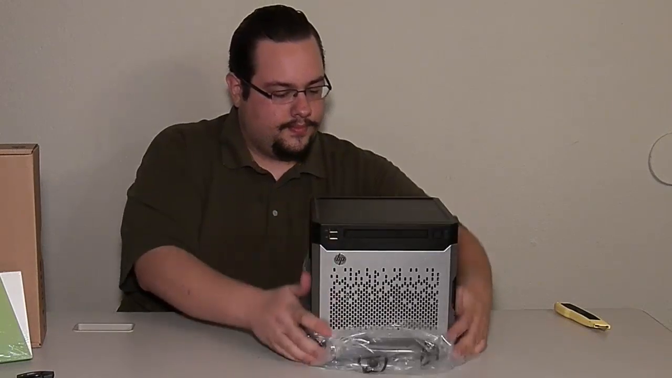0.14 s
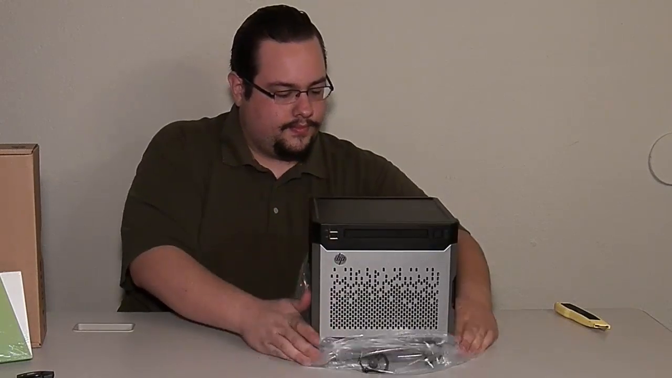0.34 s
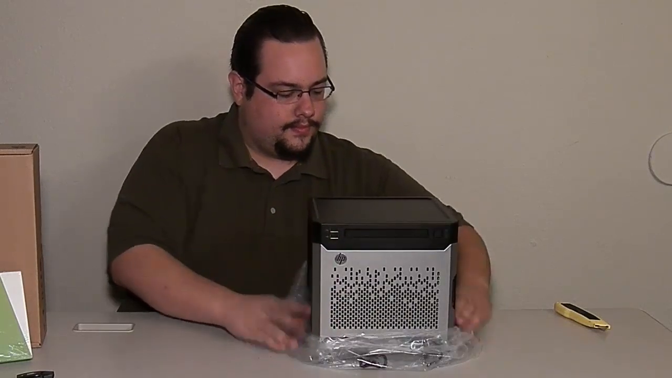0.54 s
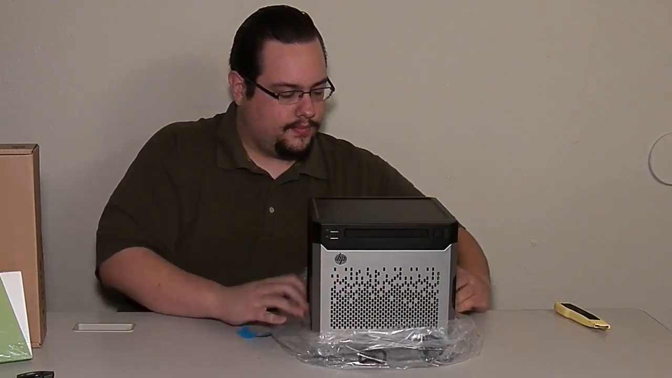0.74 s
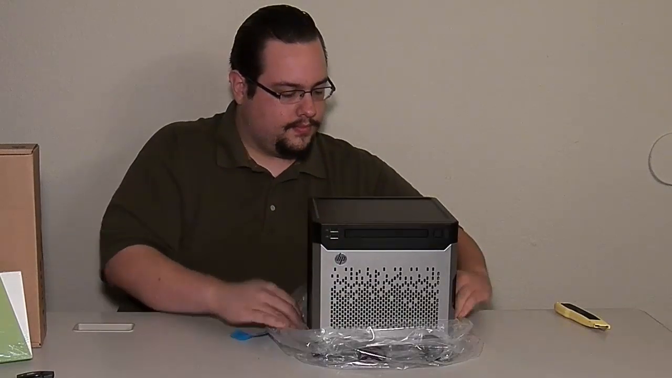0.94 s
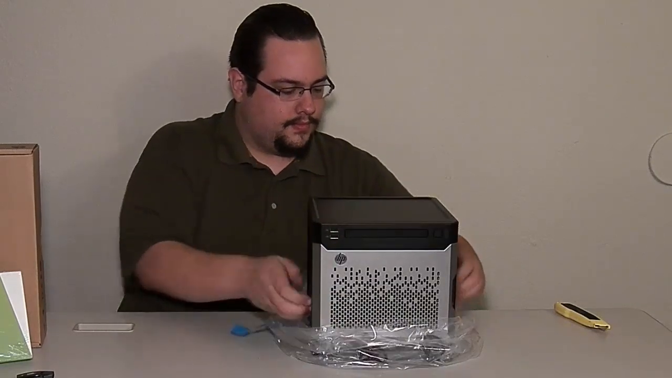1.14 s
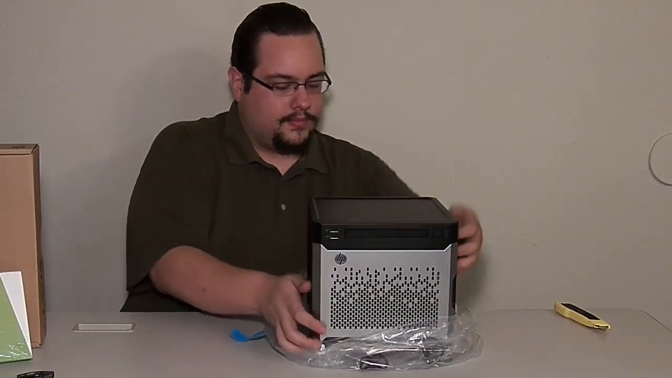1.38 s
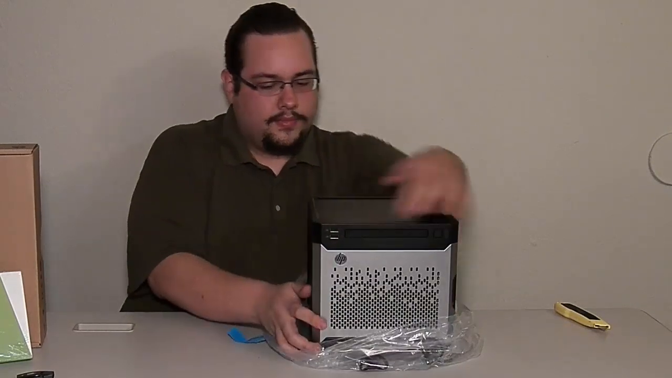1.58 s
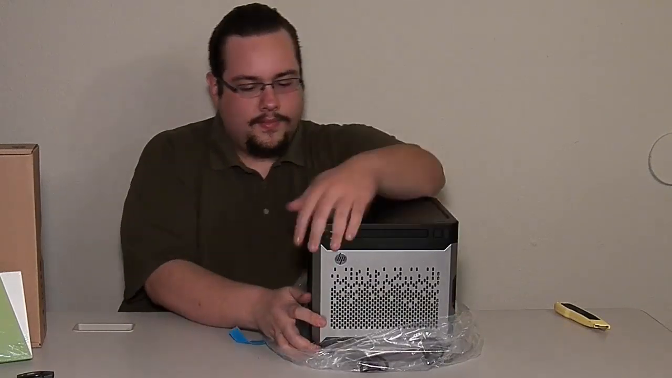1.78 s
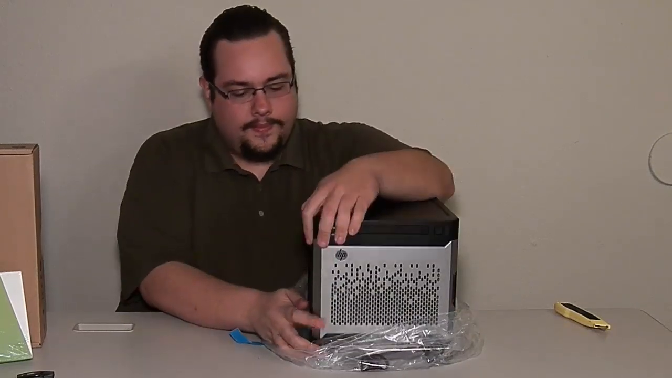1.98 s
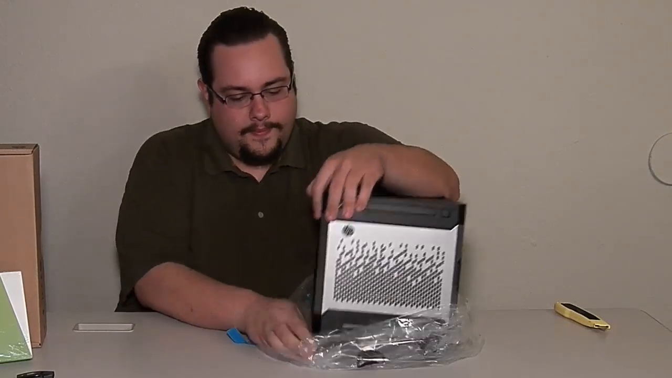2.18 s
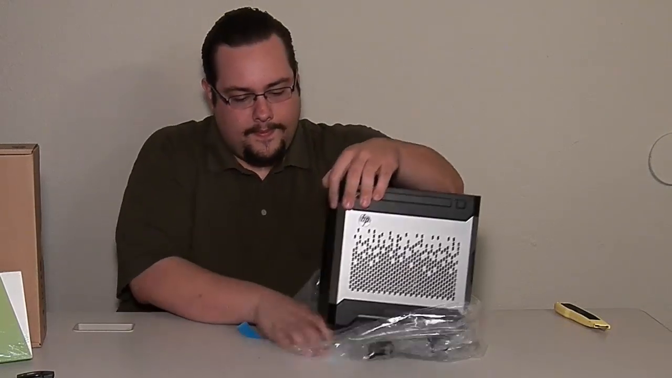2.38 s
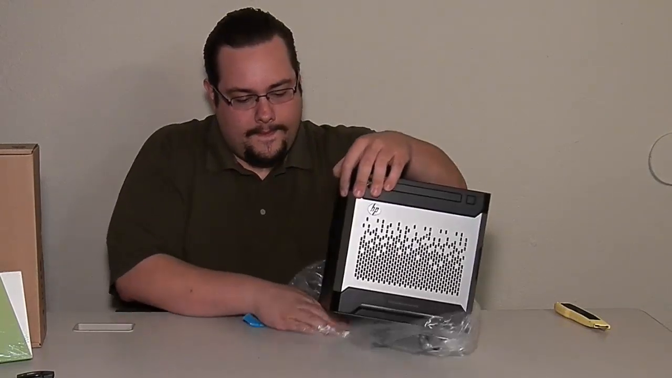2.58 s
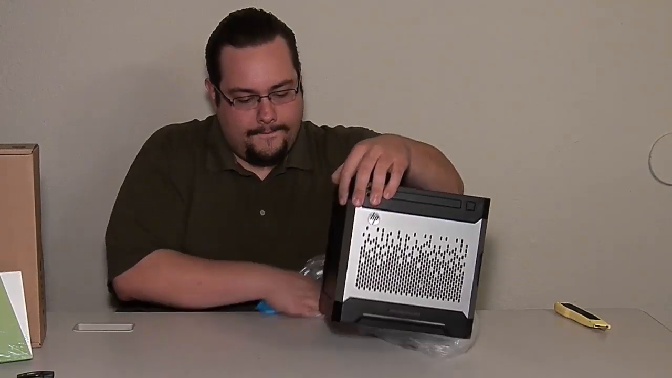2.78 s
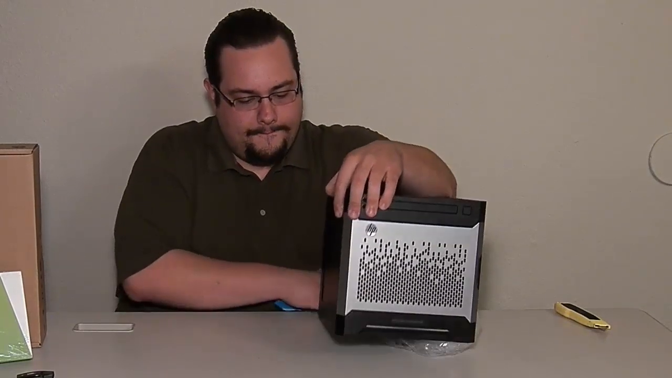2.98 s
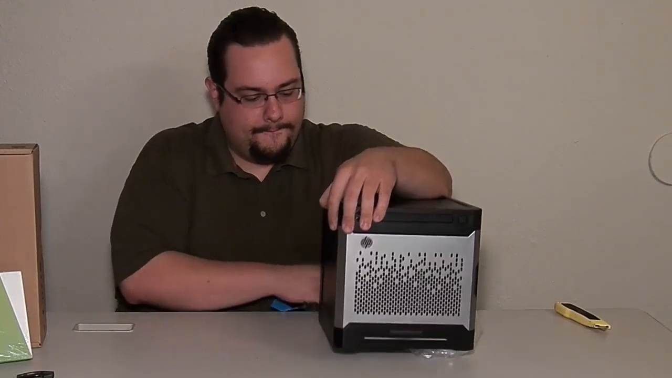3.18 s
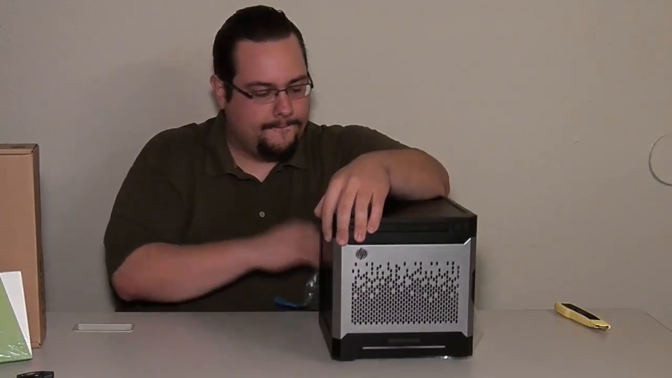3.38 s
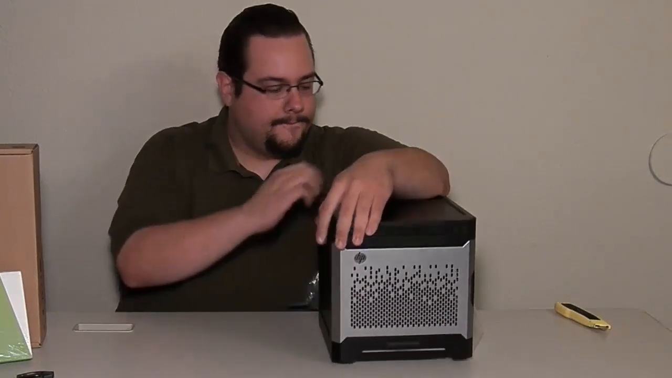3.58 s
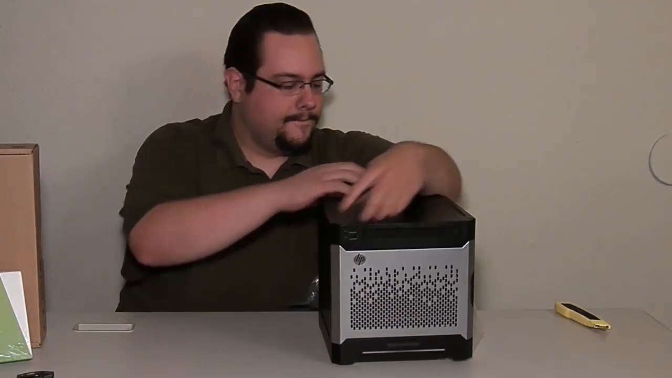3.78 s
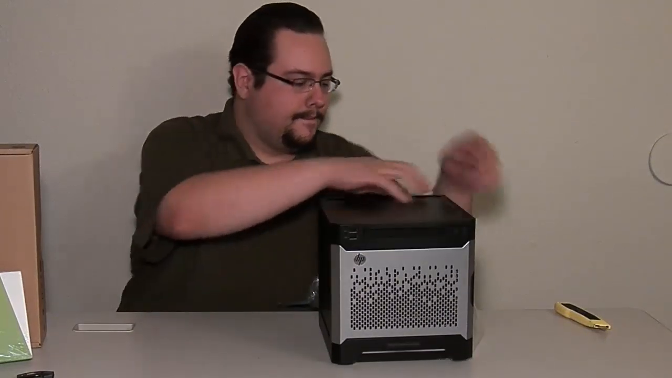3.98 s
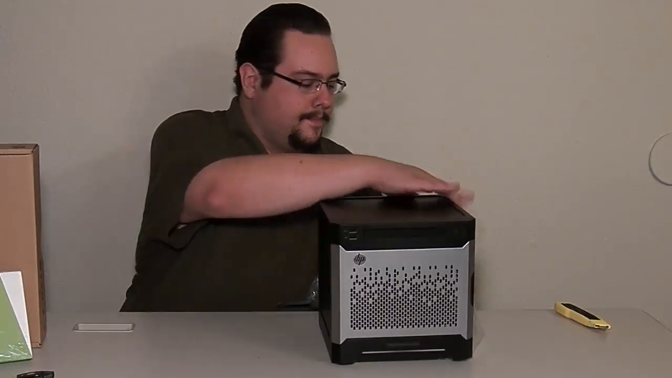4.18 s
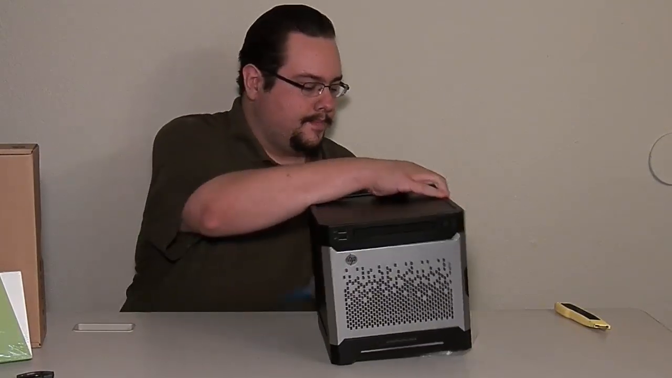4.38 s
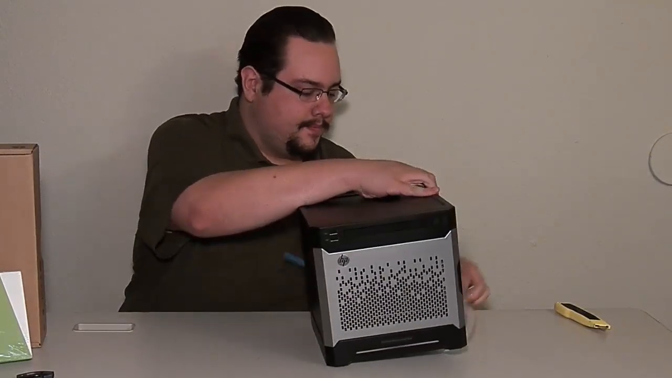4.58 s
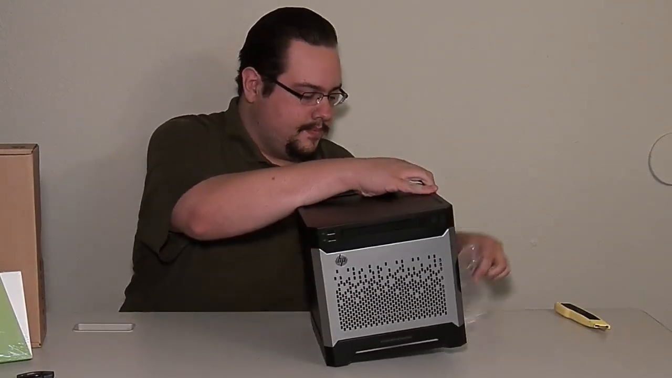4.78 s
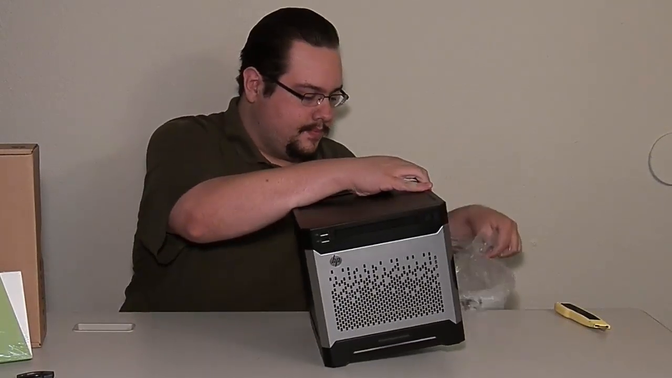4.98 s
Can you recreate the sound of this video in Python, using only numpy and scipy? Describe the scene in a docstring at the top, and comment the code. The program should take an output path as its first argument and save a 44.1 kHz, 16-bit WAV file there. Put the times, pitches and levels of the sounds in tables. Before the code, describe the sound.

Crisp film crinkling and snapping in a small room, fading to near silence before a last taut rustle and dull low bumps.

```python
"""Film crackles in tiny snaps: a thin plastic bag is worked out from under a small metal box on a desk.
Random clicks and rubbing noise, split by fold size, make the crinkle; slack sheets swish lower down.
Single creases flip through as louder clicks, and late on the taut film slides with a narrow hiss.
Resonances let the box's panels ring along, and damped desk modes make soft thuds as it sets down.
A small room answers with decaying noise echoes; a faint hum, hiss and thin whine lie underneath."""
import sys
import numpy as np
from scipy import signal
from scipy.fft import rfft, irfft, next_fast_len
from scipy.io import wavfile
from scipy.ndimage import map_coordinates

SR = 44100
rng = np.random.default_rng(int(sys.argv[2]) if len(sys.argv) > 2 else 0)


def put_to_file(sound):
    """Save the sound as 16-bit audio at rate SR, in the file named by the first command-line argument."""
    columns = np.atleast_2d(sound).T  # one column per channel
    safe = np.clip(columns, -1, 1)
    whole_steps = np.round(safe * 32767)
    wavfile.write(sys.argv[1], SR, whole_steps.astype(np.int16))


N = 222043
TIME = np.arange(N) / SR
SIZE = next_fast_len(N + SR, real=True)
HZ = np.fft.rfftfreq(SIZE, 1 / SR)

# how hard the film is worked in each move of the hands: [t/s, effort level/dB]
LOWER_BOX = [(0.0, -38.5), (0.06, -42), (0.15, -45), (0.18, -43), (0.22, -47.5), (0.33, -43.5), (0.58, -43),
             (0.66, -47.5), (0.88, -40), (0.98, -56)]
FREE_EDGES = [(1.0, -53), (1.115, -47), (1.16, -51.5), (1.21, -52.5), (1.275, -51), (1.29, -50.5),
              (1.39, -50.5), (1.47, -55), (1.59, -60), (1.66, -57), (1.755, -57), (1.8, -65), (1.88, -59),
              (1.955, -61.5), (2.02, -57.5), (2.06, -60), (2.12, -57), (2.178, -53)]
PULL_UNDER = [(2.19, -51), (2.221, -49), (2.31, -44), (2.43, -43), (2.531, -45.5), (2.57, -41.5),
              (2.71, -44), (2.74, -42.5), (2.859, -42), (3.079, -54.5)]
LET_GO = [(3.11, -50.5), (3.199, -53), (3.27, -57.5), (3.35, -52.5), (3.41, -52), (3.47, -62.5),
          (3.51, -59.5), (3.56, -71.5), (3.59, -63), (3.67, -60), (3.75, -67.5), (3.87, -76), (3.92, -81),
          (3.97, -79.5)]
# the film all but rests: [t/s, effort level/dB]
PAUSE = [(4.02, -81), (4.05, -77.5), (4.09, -86), (4.19, -83)]
DRAW_AWAY = [(4.21, -70), (4.26, -57), (4.30, -54), (4.41, -49), (4.461, -51.5), (4.58, -46), (4.68, -45.5),
             (4.75, -47), (4.799, -43), (4.90, -50), (4.925, -44.5), (4.96, -53), (5.03, -51)]
# colour of the crinkling, a power density: [f/Hz, level/dB]
FILM_COLOUR = [(25, -16), (55, -16), (85, -12), (190, -12), (250, -18), (330, -6), (430, -5), (650, -2.2),
               (1200, 2), (1900, 1.5), (2900, -4), (3900, 1.5), (4900, -4), (11000, -17.5), (15000, -26.5)]
# bass from slack sheets flapping, relative: [t/s, level/dB]
SLACK_LEVEL = [(0, -8.5), (0.7, -11), (0.95, -11.5), (1.25, -12.5), (1.55, -24), (2.0, -24), (2.19, -14.5),
               (2.35, -9.5), (2.6, -6.5), (2.9, -6.5), (3.3, -16), (3.58, -21), (3.8, -2), (5.03, -8)]
# low mids from broad creases, relative: [t/s, level/dB]
CREASE_LEVEL = [(0, -3.5), (1.3, -3), (1.75, -1), (1.92, -5.5), (2.15, -1.5), (2.45, -4), (3.15, -2),
                (3.5, -0.5), (3.7, -5.5), (3.9, -4), (4.3, -4.5), (4.7, -5), (4.82, -3.5), (5.03, -6)]
# treble from fine wrinkles, relative: [t/s, level/dB]
WRINKLE_LEVEL = [(0, -3.5), (0.498, -5), (.75, -3.5), (1.4, -6.5), (1.75, -4), (2.12, -13.5), (2.2, -4),
                 (2.45, -3), (2.95, -6.5), (3.2, -5), (3.5, -6), (3.75, -7), (4.3, -5.5), (4.41, -3.5),
                 (4.6, -5.5), (5.03, -4)]
# taut film; rows: slack sheets, wide creases, creases, crinkle, wrinkles
# [level change while taut/dB, time to slacken/s]
TAUT_CHANGE = [(-17.5, 0.23), (-17, 0.11), (-12, 0.064), (-10, 0.078), (-18, 0.14)]
# folds that a snap shakes, broad to fine: [low f/Hz, high f/Hz]
SNAP_FOLDS = [(800, 3600), (2500, 5300), (5500, 9400)]
# single loud snaps of the film, relative:
# [t/s, low crease level/dB, middle crinkle level/dB, high wrinkle level/dB]
SNAPS = [(0.039, -48, -31, -44), (0.0418, -51, -37, -46), (0.1441, -52, -39, -47.5),
         (0.1565, -51, -41, -35.5), (0.325, -44, -36, -46), (0.3336, -47, -49, -34.5),
         (0.3892, -40, -36, -51), (0.4745, -47, -32, -49), (0.4965, -49.0, -34, -51),
         (0.5235, -39, -46, -47), (0.5305, -44, -39, -46.0), (0.8057, -49, -43, -41.0),
         (0.8127, -42, -35.0, -40.0), (1.0198, -59, -52, -46), (1.1158, -49.5, -44, -53),
         (1.1783, -42.5, -49.5, -64), (1.2835, -57.5, -44.5, -56), (1.3282, -62, -43.0, -50),
         (1.3366, -50, -57, -50.0), (1.3411, -58, -49, -45), (1.4346, -50, -54, -58.5),
         (1.4626, -58, -42.5, -48), (1.4913, -55, -48, -56), (1.5485, -50, -49, -60),
         (1.5977, -64.5, -51, -47), (1.638, -55.5, -48, -49), (1.6685, -58, -45, -57.5),
         (1.674, -56, -46.5, -61.5), (1.7202, -46.5, -58, -58.5), (1.7457, -50, -51, -55.5),
         (1.8328, -60, -51.5, -50.0), (1.8727, -69, -50, -70), (1.8975, -60, -58, -63),
         (1.9304, -55.5, -52.5, -54.5), (1.9773, -54, -42.5, -65.5), (2.0063, -51, -55, -50),
         (2.082, -53, -51, -55), (2.1208, -46.5, -50, -58), (2.1566, -53.0, -45.0, -52),
         (2.1836, -45, -37, -43), (2.189, -48.0, -47, -45), (2.2006, -56, -51, -55),
         (2.2842, -41, -39, -49), (2.3042, -41, -32, -46), (2.3515, -49, -35.5, -40),
         (2.4102, -48, -27, -46), (2.4248, -44, -29, -39), (2.4379, -39.5, -28.5, -42),
         (2.4498, -33, -38, -53), (2.5524, -39.0, -34, -46), (2.5712, -42, -34.0, -50),
         (2.5913, -41, -29, -59), (2.623, -39.5, -37, -42), (2.6509, -39, -38, -41),
         (2.681, -41, -27.5, -47), (2.7167, -46, -34, -40.5), (2.7232, -55, -37, -45),
         (3.006, -44, -43, -58), (3.1162, -43.5, -55, -55), (3.1282, -49, -46, -44.5),
         (3.1813, -54.0, -39, -51.0), (3.3064, -52, -46.5, -60), (3.3319, -57, -47, -53.0),
         (3.334, -41, -37, -50), (3.346, -56, -43, -49), (3.3843, -50.0, -41.0, -55),
         (3.3884, -46, -50, -48.5), (3.391, -59, -44, -54), (3.398, -55, -45.0, -57.0),
         (3.4237, -49, -43, -63), (3.4367, -51, -63.0, -61), (3.4598, -64.5, -59, -55),
         (3.4897, -43, -54, -58), (3.4988, -48, -45, -49.5), (3.503, -52.5, -51, -52.0),
         (3.5688, -60, -41.5, -61), (3.5862, -64, -51.5, -62), (3.5984, -57, -47, -76),
         (3.6132, -49.5, -46, -67), (3.639, -69.5, -49.5, -57), (3.648, -57, -48, -54.5),
         (3.6678, -65.5, -51, -53.5), (3.8972, -79, -59, -75), (3.9089, -92.0, -65, -79.0),
         (4.239, -81.5, -51, -64), (4.257, -70, -50, -71.5), (4.2641, -72, -43, -67),
         (4.3543, -61.5, -45, -57), (4.4051, -60.0, -48, -41), (4.7629, -49, -37, -47)]
# a snap has less bass and less fine top than the crinkling: [f/Hz, level/dB]
SNAP_COLOUR = [(400, -9.5), (900, 0), (8000, -1), (13000, -6)]
# thin panels of the box that the film rubs on: [f/Hz, width/Hz, level/dB]
CASING_MODES = [(424, 23, -3), (522, 14, -3.5), (638, 49, -7), (815, 40, -7), (1135, 12, -3),
                (1330, 25, -6), (1450, 30, -5), (1604, 30, -7), (1780, 28, -17)]
# the box's hollow side drags over the film: [t/s, level/dB, length from middle to -17 dB/s, pitch f/Hz]
DRAGS = [(0.887, -51, 0.09, 440), (1.102, -53, 0.034, 436), (1.229, -51.5, 0.026, 451),
         (2.199, -52.5, 0.017, 583), (2.257, -50, 0.017, 580), (3.047, -55, 0.0296, 421),
         (4.05, -78, 0.01, 396), (4.121, -72, 0.0079, 500), (4.798, -56, 0.047, 439)]
# partials of the side panel: [multiple of the pitch, level/dB]
PANEL_PARTIALS = [(1, -4), (1.195, -11.5)]
# the box meets the desk: [t/s, peak level/dB, contact time/s]
THUDS = [(3.683, -44.5, 0.0068), (3.707, -45.5, 0.0042), (3.820, -51, 0.0057), (3.840, -53, 0.0049),
         (4.449, -46, 0.0078), (4.558, -52, 0.026), (4.771, -52.5, 0.017), (4.836, -57, 0.01)]
# modes of box and desk together: [f/Hz, level/dB, t60/s]
DESK_MODES = [(82, -6.5, 0.55), (121.4, 11.5, 0.21), (144, 7, 0.094), (193.6, -5.5, 0.14),
              (240, -12, 0.063), (368, -30, 0.25)]
# decay of the room: [f/Hz, t60/s]
ROOM_DECAY = [(100, 0.31), (500, 0.24), (4000, 0.37), (14000, 0.28)]
# likeness of the diffuse field at the two microphones: [f/Hz, coherence]
COHERENCE = [(30, 0.25), (120, 0.59), (400, 0.61), (1000, 0.55), (2200, 0.18), (6000, 0.047), (15000, 0)]
# room and microphone at rest, a power density: [f/Hz, level/dB]
QUIET_COLOUR = [(25, -18), (85, 8), (160, -4.5), (300, -7.5), (420, 1), (700, -10), (2700, -23),
                (8000, -12), (11000, -8), (15000, -24.5)]

CRINKLE_DB = -3  # over the effort
BUSY_DB = -43  # effort that counts as busy
BUSY_PER_S, IDLE_PER_S = 1500, 260  # buckles added at a busy effort; buckles always there
DENSITY_GROWS = 0.65  # dB of added buckling rate per dB of effort
RUB_DB, RUB_GROWS = -15, 0.052  # film on film re the buckling; dB of rise per dB of effort
SLACK_RUB = 1.63  # amplitude added to the rubbing: slack sheets swish more than they click
# the last move starts with the film taut, before it begins to crumple
TAUT_AT_S, TAUT_FOR_S, TAUT_RUB = 4.21, 0.18, 1.38  # start, time to slacken, added rubbing amplitude
WRINKLE_GROWS = 0.048  # a harder pull is brighter: dB of wrinkles per dB of effort
OWN_SHARE = 0.28  # power of the buckling that stays within one size of fold
WIDE_FOLLOWS = 0.2  # share of the slack sheets' level change that the widest creases follow
SLIDE_HZ, SLIDE_WIDTH_HZ, SLIDE_DB = 4050, 1200, -55.5
SLIDE_AT_S, SLIDE_RISE_S, SLIDE_FALL_S = 4.262, 0.022, 0.052
SNAP_DB, SNAP_S = 1.5, 0.00079  # overall level; time over which the level holds
FLIP_S, FLIP_ROUGH = 0.00021, 0.36  # decay time and relative size of the flip's chatter
SHIVER_DB, SHIVER_S = -10.5, 0.0028  # the sheet shivers on: level re the flip, decay time
TOP_HZ = 15200


def crinkle():
    """A harder pull buckles the film more often; the larger the fold, the lower it sounds."""
    moves = np.concatenate([LOWER_BOX, FREE_EDGES, PULL_UNDER, LET_GO, PAUSE, DRAW_AWAY])
    effort_db = over_time(moves)
    over_busy_db = effort_db - BUSY_DB
    slack_db, crease_db, wrinkle_db = map(over_time, (SLACK_LEVEL, CREASE_LEVEL, WRINKLE_LEVEL))
    per_second = BUSY_PER_S * amp(DENSITY_GROWS * over_busy_db) + IDLE_PER_S
    rub = amp(RUB_DB + RUB_GROWS * over_busy_db) + TAUT_RUB * tautness(TAUT_FOR_S)
    shared = buckles(per_second, spread_db=6.5, largest_db=15)
    clumps = amp(0.44 * wobble(110))  # one buckle sets off its neighbours
    colour = amp(along(FILM_COLOUR, HZ))
    film = causal(colour)

    wide_db = crease_db + WIDE_FOLLOWS * (slack_db - slack_db.max()) - 4.5
    fine_db = wrinkle_db + WRINKLE_GROWS * over_busy_db
    folds = [(0, 700, slack_db, rub + SLACK_RUB),  # low Hz, high Hz, level dB, rubbing amplitude
             (700, 1150, wide_db, rub),
             (1150, 2600, crease_db - 2, rub),
             (2600, 6500, 0, rub),
             (6500, SR / 2, fine_db, rub)]
    out = np.zeros(N)
    for (low, high, db, rubbing), (taut_db, life) in zip(folds, TAUT_CHANGE):
        own = buckles(per_second, spread_db=6.5, largest_db=15)
        clicks = np.sqrt(1 - OWN_SHARE) * shared + np.sqrt(OWN_SHARE) * own
        drive = unit((clicks + rubbing * rng.standard_normal(N)) * clumps)
        gain = band(low, high)
        fold = filtered(drive, film * gain) / np.sqrt(np.mean((colour * gain) ** 2))
        out += amp(db + taut_db * tautness(life)) * fold
    return amp(effort_db + CRINKLE_DB) * out


def tautness(life):
    """The pull tightens the film at once, then it slackens smoothly from 1 to 0."""
    return (TIME > TAUT_AT_S) * np.exp(-((TIME - TAUT_AT_S) / life) ** 2)


def buckles(per_second, spread_db, largest_db, life_s=0.00011, order=32):
    """Random tiny clicks, most weak and a few strong, each with a colour of its own."""
    at = np.flatnonzero(rng.random(N) < per_second / SR)
    size_db = np.minimum(spread_db * rng.exponential(size=len(at)), largest_db)
    size = amp(size_db) / np.sqrt(per_second[at])  # denser clicks are smaller, so the power stays even
    lags = np.arange(order)
    shapes = rng.standard_normal((len(at), order)) * np.exp(-lags / SR / life_s)
    shapes *= (size / np.linalg.norm(shapes, axis=1))[:, None]
    places = at[:, None] + lags
    return unit(np.bincount(places.ravel(), shapes.ravel(), N)[:N])


def slide(per_second=900):
    """Pulled taut, the film slips in small jerks that all ring at one narrow pitch."""
    jerks = buckles(np.full(N, per_second), spread_db=4, largest_db=12)
    hiss = unit(filtered(jerks, resonance(SLIDE_HZ, SLIDE_WIDTH_HZ) ** 2))
    t = TIME - SLIDE_AT_S
    swell = np.exp(-np.abs(t) / np.where(t < 0, SLIDE_RISE_S, SLIDE_FALL_S))
    return amp(SLIDE_DB) * swell * (TIME > TAUT_AT_S) * hiss


def snaps(size=1024, order=700):
    """A crease flips through, chatters and shivers: one click coloured by the folds it shakes."""
    out = np.zeros(N + SR)
    t = np.arange(order) / SR
    hz = np.fft.rfftfreq(size, 1 / SR)
    film = amp(along(FILM_COLOUR, hz))
    centres = [np.sqrt(low * high) for low, high in SNAP_FOLDS]
    for s, *levels in SNAPS:
        chatter, shiver = rng.standard_normal((2, order))
        flip = unit((t == 0) + FLIP_ROUGH * chatter * np.exp(-t / FLIP_S))
        motion = flip + amp(SHIVER_DB) * unit(shiver * np.exp(-t / SHIVER_S))
        # what the flip already holds in each fold size is taken off the wanted level
        power = np.abs(rfft(flip, size) * film) ** 2
        shares = [2 * power[(hz > low) & (hz < high)].sum() / size for low, high in SNAP_FOLDS]
        tilt = list(zip(centres, levels - 10 * np.log10(shares)))
        colour = film * amp(along(tilt, hz) + along(SNAP_COLOUR, hz))
        click = np.convolve(motion, irfft(causal(colour)))
        out[round(s * SR):][:len(click)] += amp(SNAP_DB) * np.sqrt(SNAP_S * SR) * click
    return out[:N]


def casing(rustle):
    """The film presses on the box, whose thin panels ring along."""
    modes = sum(amp(db) * resonance(hz, width) for hz, width, db in CASING_MODES)
    return filtered(rustle, modes)


def drags(waver=0.93):
    """Each short slide makes the panel swell and fade with an unsteady tone, pitched by where it touches."""
    out = np.zeros(N)
    for s, db, length, hz in DRAGS:
        near = np.abs(TIME - s) < 2 * length
        t = TIME[near] - s
        tone = np.zeros(len(t))
        for ratio, level in PANEL_PARTIALS:
            drift = map_coordinates(rng.standard_normal(64), [(t - t[0]) * 110])
            tone += amp(level) * np.sin(2 * np.pi * hz * ratio * t + waver * drift)
        out[near] += amp(db) * np.exp(-2 * (t / length) ** 2) * unit(tone)
    return out


def thuds():
    """Soft feet press on the desk, so only its low modes swell and ring briefly."""
    out = np.zeros(N + SR)
    t = np.arange(SR // 2) / SR
    ring = sum(amp(db - 60 * t / t60) * np.sin(2 * np.pi * hz * t) for hz, db, t60 in DESK_MODES)
    for s, db, contact in THUDS:
        press = 1 - np.exp(-(t / contact) ** 2)
        blow = np.gradient(ring * press)  # slow motion radiates little
        out[round(s * SR):][:len(t)] += amp(db) * blow / np.abs(blow).max()
    return out[:N]


def room(x, early_db=5, early_s=0.0079, count=10):
    """Desk and walls answer; the echo pattern shifts as the sound moves from fold to fold."""
    hz, t, noise = signal.stft(rng.standard_normal((count, 2, SR // 3)), SR, nperseg=256)
    decay = amp(-60 * t / along(ROOM_DECAY, hz)[:, None] + early_db * np.exp(-t / early_s))
    tails = signal.istft(noise * decay, SR, nperseg=256)[1]
    tails[..., :SR // 1000] = 0  # no echo in the first millisecond
    tails /= np.linalg.norm(tails, axis=-1, keepdims=True)
    place = np.array([wobble(60) for _ in range(count)])
    place /= np.linalg.norm(place, axis=0)
    echoes = signal.fftconvolve((x * place)[:, None], tails, axes=-1)[..., :N]
    return diffuse(echoes.sum(axis=0))


def diffuse(pair):
    """Two unrelated signals become a diffuse field: alike in the bass, apart in the treble."""
    turn = np.arccos(np.clip(along(COHERENCE, HZ), -1, 1)) / 2
    mid, side = filtered(pair, np.array([np.cos(turn), np.sin(turn)]))
    return np.array([mid + side, mid - side])


def background(floor_db=-75, whine_hz=11843, whine_db=-92):
    """Low room hum and microphone hiss as coloured noise, with a thin electronic whine as a sine."""
    noise = filtered(rng.standard_normal((2, N)), amp(along(QUIET_COLOUR, HZ)))
    whine = unit(np.sin(2 * np.pi * whine_hz * TIME + wobble(25)))
    return amp(floor_db) * unit(diffuse(noise)) + amp(whine_db) * whine


def amp(db):
    """Decibels to gain."""
    return 10 ** (np.asarray(db) / 20)


def unit(x):
    """Scale to rms 1."""
    return x / np.sqrt(np.mean(x ** 2))


def over_time(points):
    """Draw straight lines through (s, value) points."""
    return np.interp(TIME, *np.transpose(points))


def along(points, hz):
    """Read (Hz, value) points on a log axis."""
    f, v = np.transpose(points)
    return np.interp(np.log(hz + 1), np.log(f), v)


def wobble(rate):
    """A smooth random curve with rate knots a second."""
    return map_coordinates(rng.standard_normal(int(N * rate / SR) + 4), [TIME * rate])


def filtered(x, response):
    """Apply a frequency response given on HZ."""
    return irfft(rfft(x, SIZE) * response, SIZE)[..., :N]


def band(low, high):
    """Gain of a band with steep edges."""
    below_high = 1 / (1 + (HZ / high) ** 8)
    below_low = 1 / (1 + (HZ / low) ** 8) if low else 0
    return below_high - below_low


def resonance(hz, width):
    """Response of one resonance, 1 at its peak."""
    return 1j * HZ * width / (hz ** 2 - HZ ** 2 + 1j * HZ * width)


def causal(gain):
    """The minimum-phase response with this gain, which rings only after its cause."""
    half = len(gain) - 1
    cepstrum = irfft(np.log(np.maximum(gain, 1e-6)))
    cepstrum[1:half] *= 2
    cepstrum[half + 1:] = 0
    return np.exp(rfft(cepstrum))


def scene():
    """Bag and box straight ahead, with the room around them."""
    rustle = crinkle() + slide()
    cracks = snaps()
    box = thuds() + drags() + casing(rustle)
    direct = amp(-2.2) * rustle + cracks + box
    into_room = amp(1.5) * rustle + amp(-0.5) * cracks + amp(-11.5) * box
    return direct + room(into_room) + background()


def record(dry):
    """A sharp band limit removes everything from TOP_HZ up."""
    return filtered(dry, HZ < TOP_HZ)


dry = scene()
out = record(dry)
put_to_file(out)
```